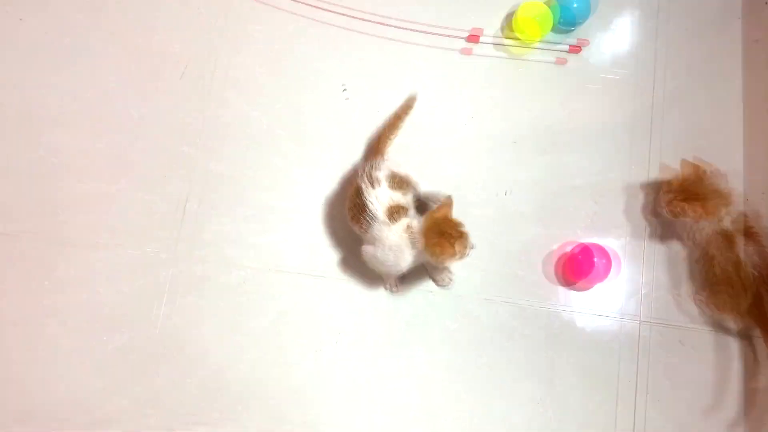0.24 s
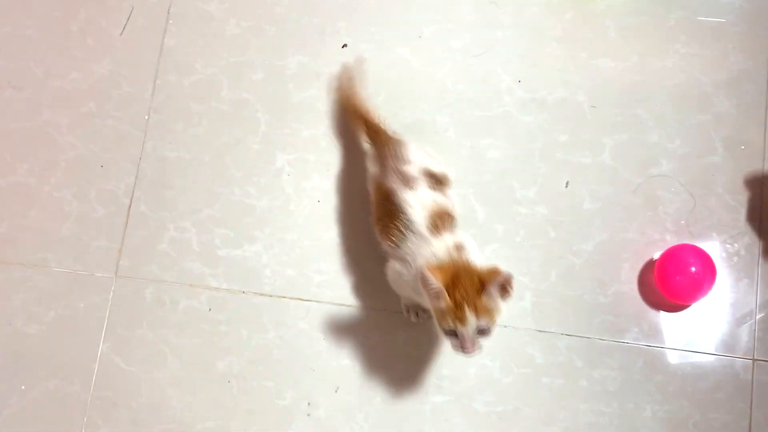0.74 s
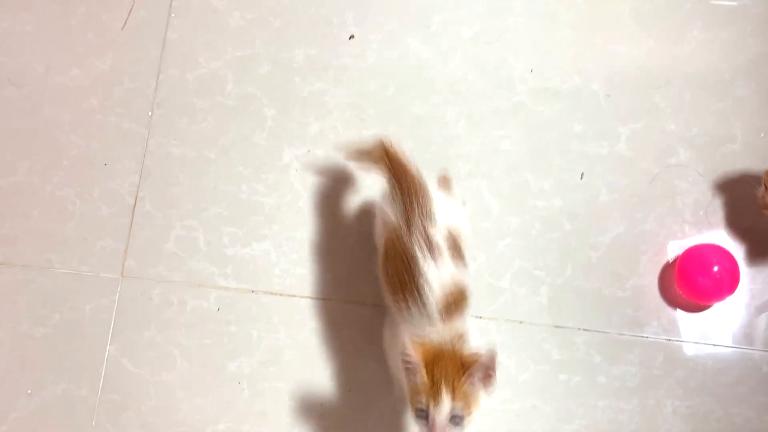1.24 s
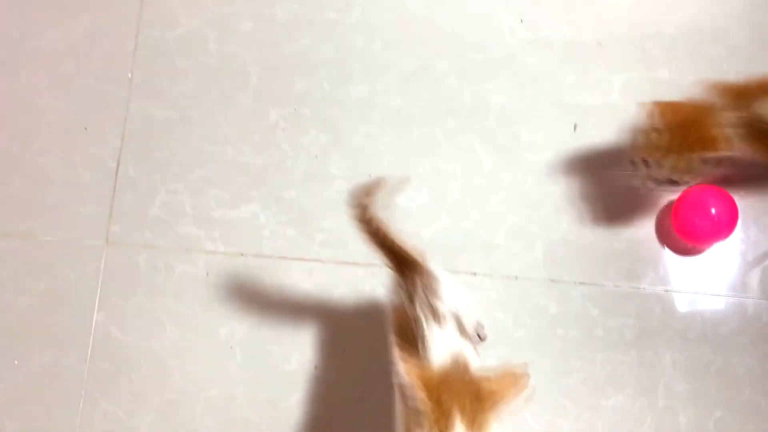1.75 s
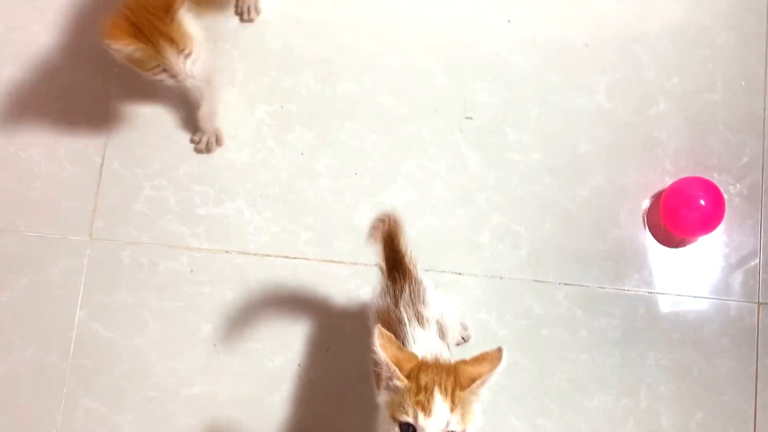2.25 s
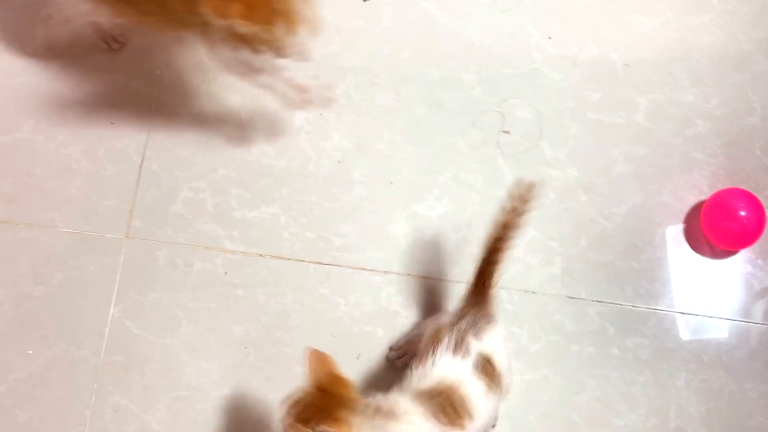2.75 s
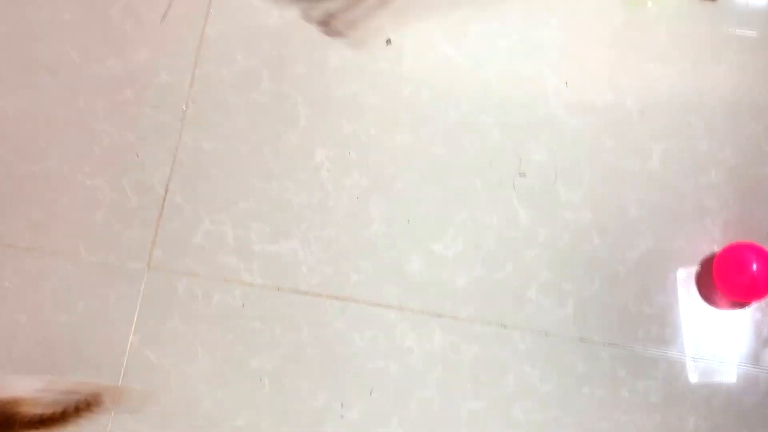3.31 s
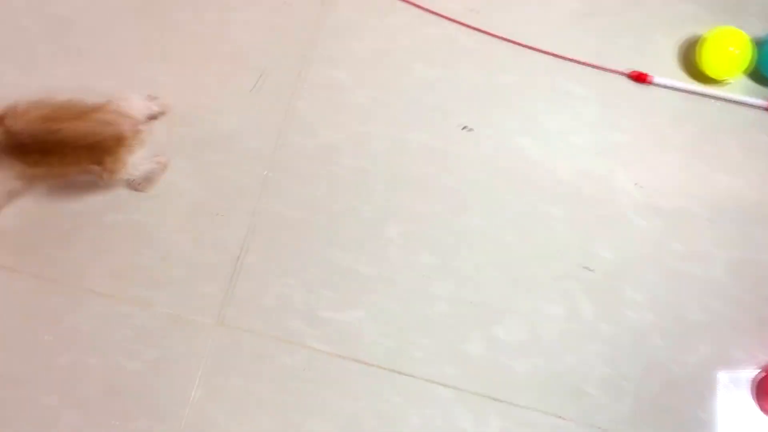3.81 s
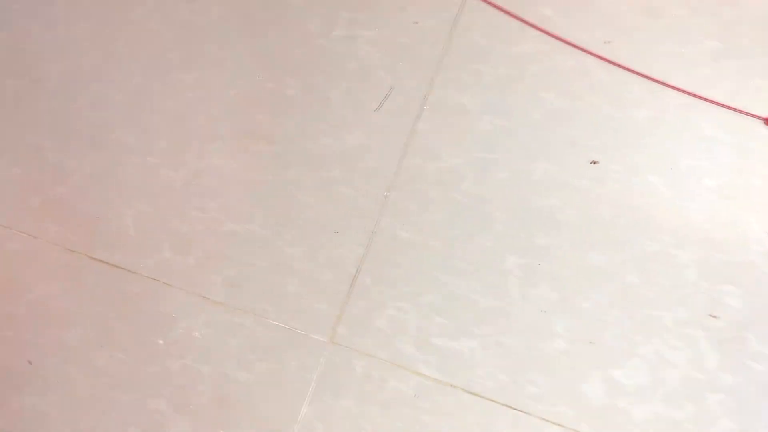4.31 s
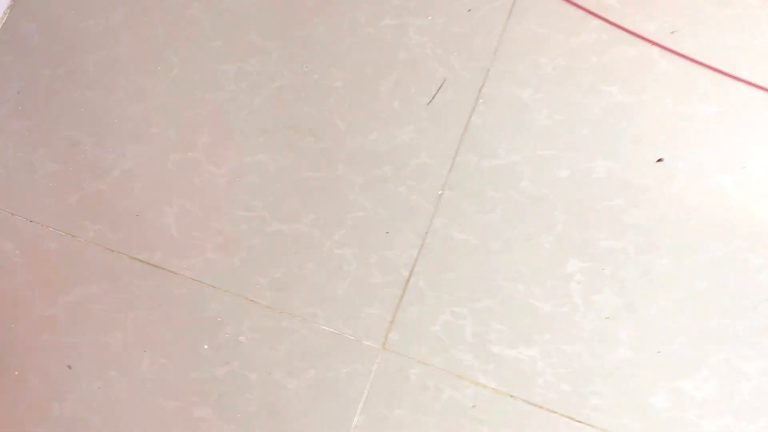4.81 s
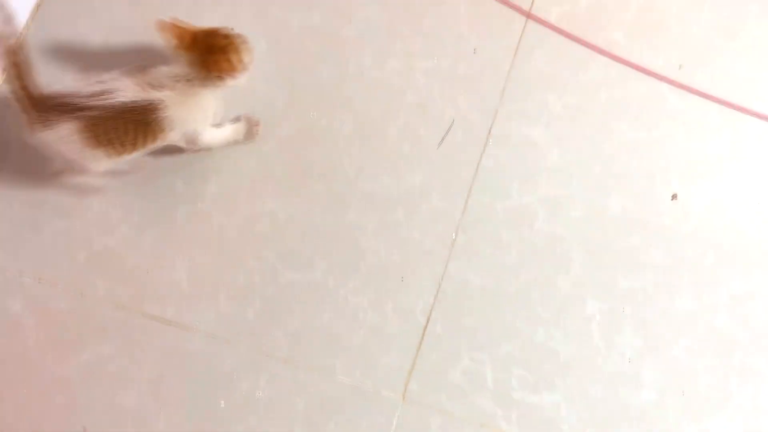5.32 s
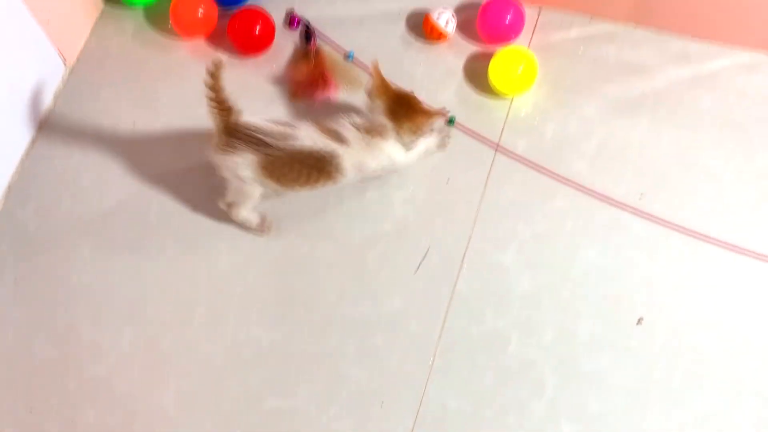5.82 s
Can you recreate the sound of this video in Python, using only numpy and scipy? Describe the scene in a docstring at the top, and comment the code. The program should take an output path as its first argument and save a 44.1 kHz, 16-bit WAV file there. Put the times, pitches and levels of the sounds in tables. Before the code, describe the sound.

Hollow plastic balls crack, knock and skitter on hard tile in an echoing room while small paws land and scuff, with faint traffic beyond.

```python
"""Kittens with hollow balls on tile

In a bare, echoing room hollow plastic balls knock and skitter over the tiles: cracks, resonant shells and floor thuds.
Shaped noise makes paw landings and scuffs; decaying sines make a toy bell and ticks from the hand-held phone.
Outside, noise rumbles as traffic; wavering tones make a thin far squeal and an engine that grows louder.
The phone's stereo processing keeps bass and treble common to both sides and lets the right side trail."""
import sys
import numpy as np
from scipy import signal
from scipy.fft import rfft, irfft, next_fast_len
from scipy.io import wavfile
from scipy.ndimage import map_coordinates

SR = 44100
rng = np.random.default_rng(int(sys.argv[2]) if len(sys.argv) > 2 else 0)


def ratio(d):
    """dB to gain"""
    e = np.asarray(d, float) / 20
    return 10 ** e


def store_wav(level_fs):
    """Save 16-bit WAV to argv[1]."""
    pcm = np.round(np.clip(np.atleast_2d(level_fs), -1, 1) * 32767)
    wavfile.write(sys.argv[1], SR, pcm.T.astype(np.int16))


N = 267246  # samples

# Resonances of a ball's shell. Each row: frequency in Hz, width in Hz, level in dB.
SHELL_MODES = [(624, 340, 7), (1520, 1150, 20.5), (2190, 770, 12), (2900, 170, 3.5), (4100, 1040, 1)]
# Resonances of floor slab and room. Each row: frequency in Hz, width in Hz, level in dB.
SLAB_MODES = [(81.5, 35, 5), (113, 20.4, 4.5), (205, 98, -6), (290, 70, -1), (390, 134, -5.5)]


def unit(x):
    """Scaled to rms 1."""
    return x / np.sqrt(np.mean(x ** 2) + 1e-20)


def peak(x):
    """Scaled to a peak of 1."""
    return x / np.abs(x).max()


def along(points, hz):
    """Interpolates (Hz, value) points on a log frequency axis."""
    f, value = np.transpose(points)
    return np.interp(np.log(hz + 1), np.log(f + 1), value)


def curves(rows):
    """One value per sample for each column after the time in seconds."""
    s, *columns = np.transpose(rows)
    return [np.interp(np.arange(N) / SR, s, column) for column in columns]


def gate(start, end, fade):
    """1 from start to end, fading to 0 outside; all in seconds."""
    return np.interp(np.arange(N) / SR, [start - fade, start, end, end + fade], [0, 1, 1, 0])


def wobble(rate):
    """A smooth random curve with this many knots a second."""
    knots = rng.standard_normal(int(N * rate / SR) + 4)
    return map_coordinates(knots, [np.arange(N) * rate / SR])


def filtered(x, response):
    """x times a complex response of frequency."""
    m = next_fast_len(x.shape[-1] + 8192)
    spectrum = rfft(x, m) * response(np.fft.rfftfreq(m, 1 / SR))
    return irfft(spectrum, m)[..., :x.shape[-1]]


def resonant(modes, stretch=1):
    """Causal response of (Hz, width in Hz, dB) resonances with alternating signs."""
    def response(f):
        total = 0
        for k, (center, width, db) in enumerate(modes):
            damping = 1j * f * width
            total = total + (-1) ** k * ratio(db) * damping / ((center * stretch) ** 2 - f * f + damping)
        return total
    return response


def noise(spectrum, channels):
    """Noise of rms 1 coloured by (Hz, dB per Hz) points."""
    skirts = [(spectrum[0][0] * .7, -80)], [(spectrum[-1][0] * 1.05, -80)]
    closed = skirts[0] + list(spectrum) + skirts[1]
    return unit(filtered(rng.standard_normal((channels, N)), lambda f: ratio(along(closed, f))))


def tone(hz, waver_hz):
    """A sine of rms 1 whose pitch wavers."""
    return np.sqrt(2) * np.sin(2 * np.pi * np.cumsum(hz + waver_hz * wobble(30)) / SR)


def add(track, s, sound):
    """Mixes a sound into a track at a time in seconds."""
    part = track[..., round(s * SR):][..., :sound.shape[-1]]
    part += sound[..., :part.shape[-1]]


def room(x):
    """A new tail: near walls answer in separate echoes, then each frequency dies at its own speed."""
    # Each row: frequency in Hz, time to fall 60 dB in seconds.
    decay = [(80, 0.51), (400, 1), (1100, 0.3), (2900, 0.69), (7700, 0.4), (14000, 0.26)]
    hz, t, z = signal.stft(rng.standard_normal((2, SR * 3 // 5)), SR, nperseg=256)
    dying = z * ratio(-60 * t / along(decay, hz)[:, None])
    tail = unit(signal.istft(dying, SR, nperseg=256)[1])
    t = np.arange(tail.shape[1]) / SR
    echoes = rng.standard_normal(tail.shape) * (rng.random(tail.shape) < .015)
    tail = tail + ratio(39.5 - 60 * t / 0.11) * echoes
    tail = tail * (1 - np.exp(-t / 0.0018))
    return signal.fftconvolve(x[None], tail / np.linalg.norm(tail[0]), axes=1)


def knocks():
    """A sharp blow with a brief chatter cracks, rings the hollow shell and thuds into the floor; the room answers."""
    # Ball contacts. Each row: start in seconds, shell level in dB, crack over shell in dB,
    # strongest shell mode in Hz, distance from the microphone in m.
    contacts = [(1.5354, -53.5, 17.5, 3500, 2.1), (1.5557, -45, 12.5, 2000, 2.3),
                (1.580, -33, 0.5, 1580, 1.64), (1.653, -32, 3.5, 2900, 1.3), (1.726, -30, 3, 3450, 1.38),
                (1.7773, -32, 1, 2060, 1.5), (2.625, -14.5, -1, 1413, .8), (2.6315, -27, 13, 2900, 0.8),
                (2.6942, -26.5, 3.5, 1800, 1.25), (2.744, -14.5, 4, 1640, 1.97), (2.8455, -17, 3, 1780, .9),
                (3.331, -49, 17, 3320, 1.65), (3.971, -36, -17, 790, 1.93), (4.2521, -41, -16, 890, 2),
                (4.2936, -46, 12, 2140, 1.6), (4.326, -35.5, 3, 2360, 2.5), (4.391, -23, -26, 1880, 1.95),
                (4.4504, -22, 2, 1270, 3.16), (4.4626, -26.5, 3, 2000, 1.9), (4.479, -28, -1, 2300, 1.4),
                (4.689, -25, -31, 1570, 1.7), (4.7377, -17, -1.5, 1430, 1.22), (4.7465, -26, -1, 1900, 1)]
    room_radius_m = 0.92  # distance where room and direct sound are equally strong
    strongest_width_hz, strongest_db = 130, 25  # the mode that a blow favours
    dents, dent_width_hz, dent_db = 9, 300, 10  # thin-wall modes that differ from blow to blow
    chatter, chatter_t60_s = 0.13, .016
    beamed_db = -8  # narrow modes radiate in beams, so the room as a whole gets less of them
    out, t = np.zeros((2, N)), np.arange(4096) / SR
    blow = (t == 0) * 1.

    def crack_response(f):
        highpass = (1j * f / 3300 / (1 + 1j * f / 3300)) ** 2
        return highpass / (1 + 1j * f / 9000) ** 2

    crack = peak(filtered(blow, crack_response))
    thud = ratio(-16.5) * peak(filtered(blow, resonant(SLAB_MODES)))
    for s, db, crack_db, hz, metres in contacts:
        # each blow lands elsewhere, and balls differ a little
        modes = [(c, w, level + rng.normal(0, 2.5)) for c, w, level in SHELL_MODES]
        stretch = ratio(rng.normal(0, .5))
        woken_db = dent_db + min(crack_db, 0)  # soft blows hardly wake the dents
        thin = [(1700 * 4.2 ** u, dent_width_hz, woken_db) for u in rng.random(size=dents)]
        thin = [(hz, strongest_width_hz, strongest_db)] + thin
        wide = filtered(blow, resonant(modes, stretch))
        narrow = filtered(blow, resonant(thin))
        ring = peak(wide + narrow) + ratio(crack_db) * crack
        spread = peak(wide + ratio(beamed_db) * narrow) + ratio(crack_db) * crack
        contact = blow + chatter * rng.standard_normal(len(t)) * ratio(-60 * t / chatter_t60_s)
        direct = signal.fftconvolve(ring, contact)[:len(t)] / np.linalg.norm(contact)
        add(out, s, ratio(db) * (direct + thud))
        add(out, s, ratio(db) * metres / room_radius_m * room(spread + thud))
    return out


def skitter():
    """Balls skitter in small uneven contacts, each a gritty click that rings the shell faintly."""
    # Each row: start in seconds, end in seconds, level of a typical contact's impulse in dB.
    runs = [(2.635, 2.83, -45), (4.285, 4.53, -36)]
    contacts_per_s = 70
    size = sum(gate(start, end, .03) * ratio(db) for start, end, db in runs)
    hits = (rng.random(N) < contacts_per_s / SR) * ratio(5 * rng.standard_normal(N)) * size
    click = resonant([(2500, 1400, 6)])
    dry = filtered(hits, lambda f: ratio(-12) * resonant(SHELL_MODES)(f) + click(f))
    return dry + room(dry)[:, :N]


def scuffs():
    """Paws, fur and balls slide on tile: each slide swells and dies in fine grains above its own lowest pitch."""
    # Each row: time of the peak in seconds, level in dB, rise in seconds, lowest frequency in Hz.
    slides = [(1.545, -54, 0.0047, 2900), (1.70, -54.5, 0.0044, 2950), (2.6192, -38, 0.0014, 2470),
              (3.334, -38.5, 0.002, 7160), (3.474, -51.5, 0.027, 4530), (3.777, -60.5, 0.011, 3270),
              (3.872, -58, 0.038, 3640), (4.298, -42, 0.0094, 1470), (4.355, -39.5, 0.013, 1590),
              (4.634, -47, 0.042, 1240), (4.69, -38, 0.006, 1100), (5.558, -71, .012, 3900),
              (6.007, -50.5, 0.0064, 4800), (6.041, -63, 0.0024, 4960)]
    # Each row: frequency in Hz, density in dB per Hz.
    rustle = [(600, 3), (3000, 2.5), (8500, -6.5), (12000, -5.5), (15700, -8.5)]
    fall_s = 0.019
    grains = unit(ratio(0.62 * wobble(300) + 4.5 * wobble(60)) * noise(rustle, channels=1)[0])
    dry, t = np.zeros(N), np.arange(N) / SR
    for s, db, rise, low_hz in slides:
        stroke = np.exp(np.minimum((t - s) / rise, (s - t) / fall_s))
        near = slice(max(round((s - .2) * SR), 0), round((s + .3) * SR))
        color = lambda f: 1 / (1 + (low_hz / (f + 1)) ** 5) / (1 + f / (3 * low_hz))
        dry[near] += ratio(db) * stroke[near] * unit(filtered(grains[near], color))
    return dry + ratio(-3.5) * room(dry)[:, :N]


def trample():
    """Paws land softly and shake the slab: low puffs of noise without a click, each favouring one slab mode."""
    # Each row: time of the peak in seconds, level in dB, fall in seconds, strongest frequency in Hz.
    landings = [(1.552, -43, .03, 62), (1.59, -50, 0.046, 255), (1.629, -54.5, .03, 292),
                (2.647, -48, .03, 109), (2.769, -34, .06, 102), (3.764, -50.5, 0.018, 251),
                (3.795, -48, 0.017, 240), (3.98, -49.5, 0.055, 295), (4.301, -40, 0.1, 98),
                (4.398, -37.5, .04, 264), (4.46, -42, 0.044, 178), (4.699, -40, 0.039, 256)]
    rise_s = 0.015
    out, t = np.zeros(N), np.arange(SR // 2) / SR - .1
    for s, db, fall, hz in landings:
        favoured = resonant([(hz, 45, 8)])
        slab = lambda f: (resonant(SLAB_MODES)(f) + favoured(f)) / (1 + (50 / (f + 1)) ** 4)
        push = np.exp(np.minimum(t / rise_s, -t / fall))
        add(out, s + t[0], ratio(db) * push * unit(filtered(rng.standard_normal(len(t)), slab)))
    return out


def bell():
    """A small toy bell: the loose clapper strikes close pairs of modes that beat."""
    # Clapper strikes. Each row: start in seconds, level in dB before the uneven damping.
    strikes = [(3.4035, -50), (3.431, -52), (3.443, -47), (3.497, -57), (3.5558, -63), (3.582, -60)]
    # Each row: frequency in Hz, level in dB, time to fall 60 dB in seconds.
    modes = [(6365, 0, .14), (6392, -3, .26), (6090, -3, .05), (6215, -2, .06)]
    dry, t = np.zeros(SR), np.arange(SR // 2) / SR
    start = strikes[0][0]
    for s, db in strikes:
        ring = 0
        for hz, level, t60 in modes:
            ring = ring + ratio(level - 60 * t / t60) * np.sin(2 * np.pi * (hz * t + rng.random()))
        add(dry, s - start, ratio(db) * ring * (1 - np.exp(-t / 0.00045)))
    dry = dry * ratio(2.5 * wobble(90)[:SR])  # it tumbles, and fur and floor damp it unevenly
    out = np.zeros((2, N))
    add(out, start, dry)
    add(out, start, ratio(-17) * room(dry))
    return out


def ticks():
    """Dry ticks at the microphone ring the phone's case; its lower modes build up more slowly."""
    # Each row: start in seconds, level in dB, lowest mode over the rest in dB.
    taps = [(0.0782, -45, 2.5), (0.1682, -40, -13), (.5048, -50.5, -10)]
    # Each row: frequency in Hz, level in dB, time to fall 60 dB in seconds.
    case_modes = [(560, 1.5, 0.033), (1240, 7, 0.0076), (2070, -1.5, 0.0095), (3500, -9, 0.006)]
    out, t = np.zeros(N), np.arange(2400) / SR
    for s, db, low_db in taps:
        for k, (hz, level, t60) in enumerate(case_modes):
            decay = ratio(db + level + low_db * (k == 0) - 60 * t / t60)
            build_up = 1 - np.exp(-t * hz / 0.52)
            add(out, s, decay * np.sin(2 * np.pi * hz * t) * build_up)
    return out


def engine():
    """An engine outside grows louder: two low orders and a fluttering gear whine that glide in pitch."""
    # Each row: time in seconds, lower order in Hz, its level in dB, higher order in Hz, its level in dB.
    orders = [(4.95, 72.7, -81, 105.7, -58), (5.4, 79.06, -57, 103.9, -69.5),
              (6.06, 73.4, -48.5, 98.6, -52.5)]
    # Each row: time in seconds, gear whine in Hz, its level in dB before the flutter.
    gear = [(4.95, 1474, -67.5), (5.892, 1422, -61.5), (6.06, 1394, -60.5)]
    low_hz, low_db, high_hz, high_db = curves(orders)
    whine_hz, whine_db = curves(gear)
    low_orders = ratio(low_db) * tone(low_hz, 2.5) + ratio(high_db) * tone(high_hz, 1.34)
    flutter_db = 2.2 * wobble(16) + 2.5 * wobble(45)
    whine = ratio(whine_db + flutter_db) * tone(whine_hz, 7)
    return gate(orders[0][0], N / SR, 0.12) * (low_orders + whine)


def squeal():
    """Far thin tones, two at a time for the most part, fade in and out as many paths through the air interfere."""
    # Each row: start in seconds, end in seconds, frequency in Hz, level in dB.
    tones = [(1.95, 2.46, 3666, -72), (2.46, 2.6, 3666, -81), (1.97, 2.44, 4129, -82),
             (4.03, 4.23, 3750, -73), (4.04, 4.23, 3300, -79)]
    out = np.zeros(N)
    for start, end, hz, db in tones:
        fading = unit(np.hypot(2.2 + wobble(50), wobble(50)))
        out += gate(start, end, 0.0288) * ratio(db) * fading * tone(hz, 4.1)
    return out


def street():
    """Traffic rumbles and roars through the walls as shaped noise, over microphone hiss, a drone and a thin whine."""
    # Each row: time in seconds, rumble in dB, roar in dB, both before they waver.
    traffic = [(0.0, -58.5, -69.5), (2.56, -57, -64), (2.77, -53, -51), (3.39, -57.5, -60.5),
               (4.35, -54, -54.5), (6.06, -55, -51.5)]
    # Three spectra, of rumble, roar and microphone self-noise. Each row: frequency in Hz, density in dB per Hz.
    rumble_color = [(13, -50), (22, -22), (54, 3.5), (124, -12.5), (188, -8), (324, -12.5), (350, -23),
                    (450, -16.5), (580, -70.5), (990, -120)]
    roar_color = [(300, 2.5), (450, -2), (650, -1.5), (1000, 0), (1500, 0.5), (2000, -9), (3300, -15.5),
                  (4200, -20), (6000, -34.5)]
    hiss_color = [(1500, -4), (3500, -8), (8000, -3), (12300, -6), (13300, -8)]
    rumble_db, roar_db = curves(traffic)
    rumble = ratio(rumble_db + 1.2 * wobble(6)) * noise(rumble_color, channels=2)
    roar = ratio(roar_db + 0.74 * wobble(21)) * noise(roar_color, channels=2)
    drone = ratio(-78.5 + 3 * wobble(12)) * tone(650, 17.8)
    hiss = ratio(-82.5) * noise(hiss_color, channels=2)
    whine = ratio(-99 + 3 * wobble(17)) * tone(6390, 20)
    return rumble + roar + drone + hiss + whine


def airy():
    """Faint bands of hiss swell from a trace, waver, slide down in pitch and sink to a trace again."""
    # Bands sharp above and soft below. Each row: start in seconds, end in seconds,
    # upper edge in Hz at the start, width in Hz, level in dB before it wavers.
    bands = [(0, 0.16, 3250, 500, -71), (0.43, 0.64, 2880, 380, -73), (0.73, 0.98, 3130, 300, -73),
             (1.28, 1.43, 2330, 130, -77)]
    slide_hz_per_s = 350
    out, t = np.zeros((2, N)), np.arange(N) / SR
    for start, end, top_hz, width_hz, db in bands:
        shape = lambda f: 1 / (1 + (f / top_hz) ** 60) / (1 + ((top_hz - f) / width_hz) ** 2)
        band = unit(filtered(rng.standard_normal((2, N)), shape))
        analytic = signal.hilbert(band, next_fast_len(N))[:, :N]
        sagged = np.real(analytic * np.exp(-1j * np.pi * slide_hz_per_s * (t - start) ** 2))
        swell = np.interp(t, [start - .03, start, end, end + 0.17], [0.083, 1, 1.0, 0.031])
        out += swell * ratio(db + 1.7 * wobble(14.1)) * sagged
    return out


def scene():
    """Near play on the tiles, the phone in the hand, the street beyond."""
    play = knocks() + skitter() + scuffs() + trample() + bell()
    return play + ticks() + engine() + squeal() + street() + airy()


def low_pass(x):
    """Removes everything above the highest recorded frequency."""
    return signal.sosfilt(signal.butter(12, 16970, fs=SR, output="sos"), x)


def record(dry):
    """The phone's stereo processing sets width, phase lead and balance by frequency and limits the band."""
    # Each row: frequency in Hz, left-right likeness given to unrelated sides (1 = the same).
    likeness = [(250, 0.92), (450, 0.042), (2500, 0.038), (4200, 0.93), (16000, 0.95)]
    # Each row: frequency in Hz, phase by which the left leads in radians.
    lead = [(380, 0), (800, 1.6), (1500, .4), (2600, 2.3), (3700, 1.9), (4700, 3.14), (16000, 19.85)]
    # Each row: frequency in Hz, left minus right in dB.
    balance = [(110, -2), (700, -1.4), (2400, 0)]
    both = np.array([dry[0] + dry[1], dry[0] - dry[1]]) / np.sqrt(2)

    def width(hz):
        turn = np.arccos(np.clip(along(likeness, hz), 0, 1)) / 2
        return np.array([np.cos(turn), np.sin(turn)]) / (1 + (hz / 15850) ** 200)

    def skew(hz):
        half = np.array([[.5], [-.5]])  # left takes half, right the opposite half
        phase = np.interp(hz, *np.transpose(lead))
        return ratio(half * along(balance, hz)) * np.exp(1j * half * phase)

    mid, side = filtered(both, width)
    mix = filtered(np.array([mid + side, mid - side]), skew)
    return low_pass(mix)


dry = scene()
out = record(dry)
store_wav(out)
```